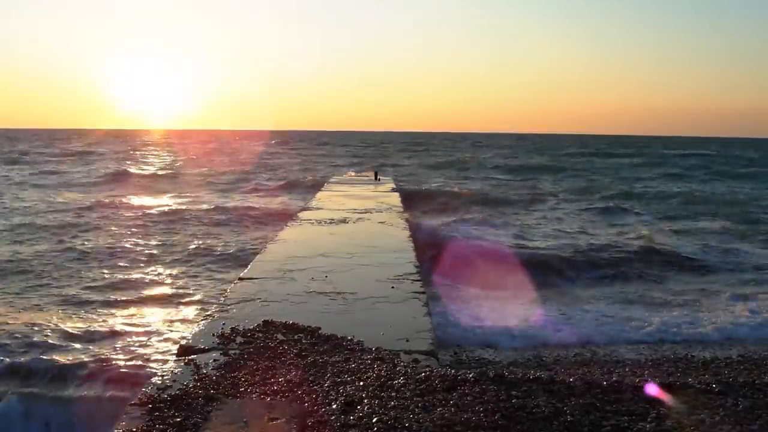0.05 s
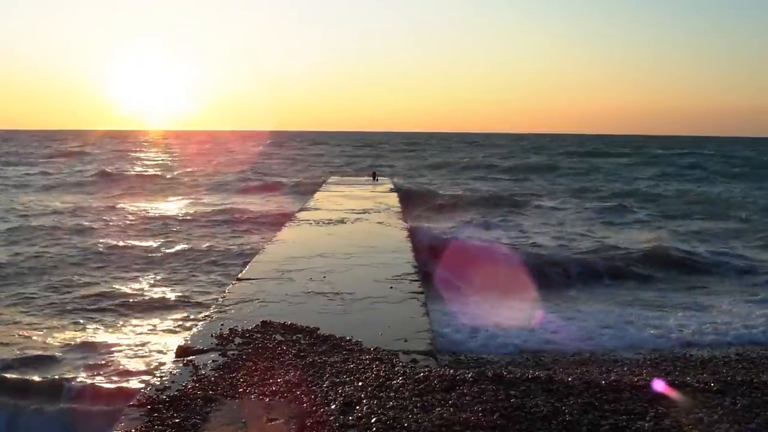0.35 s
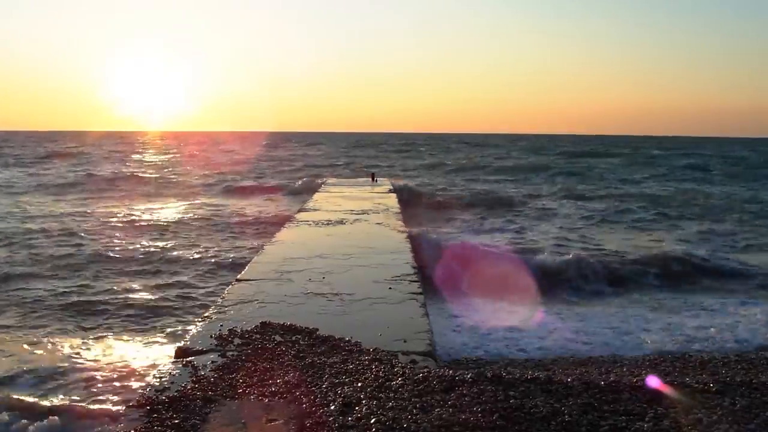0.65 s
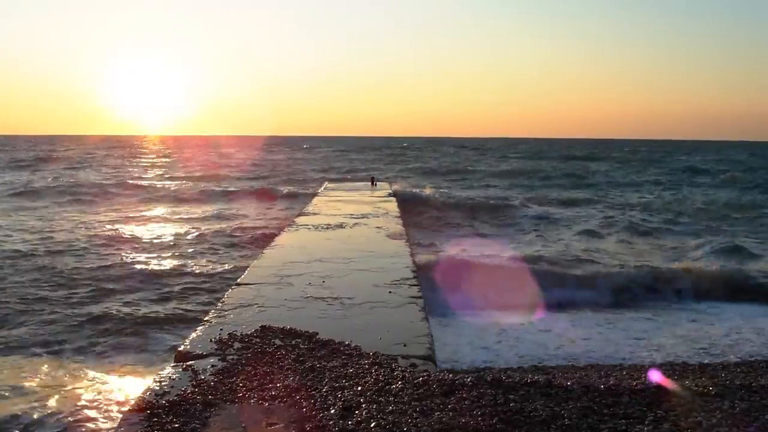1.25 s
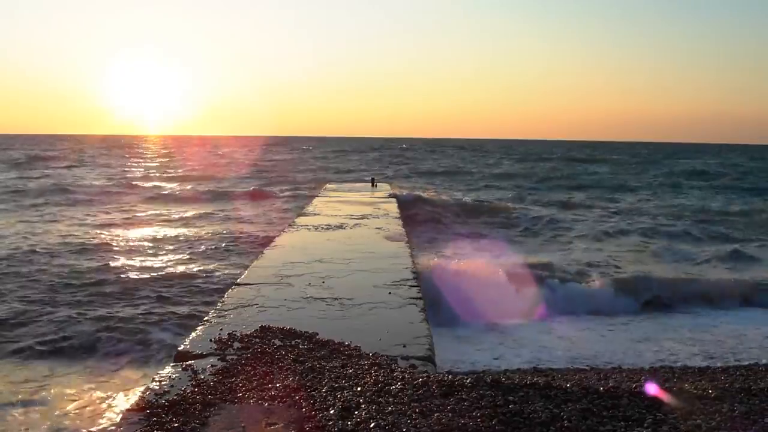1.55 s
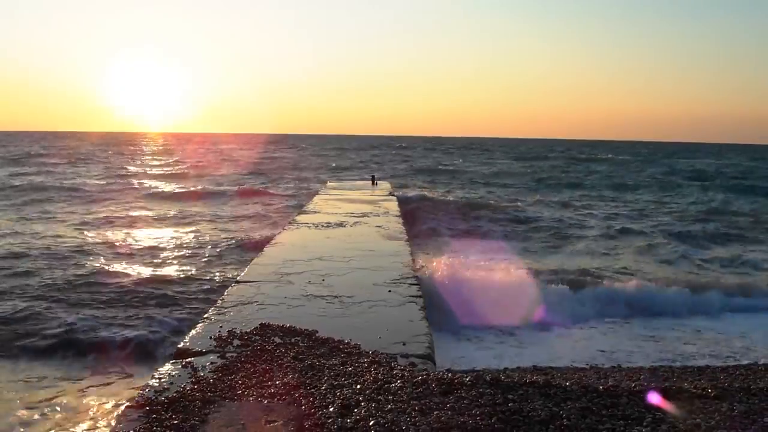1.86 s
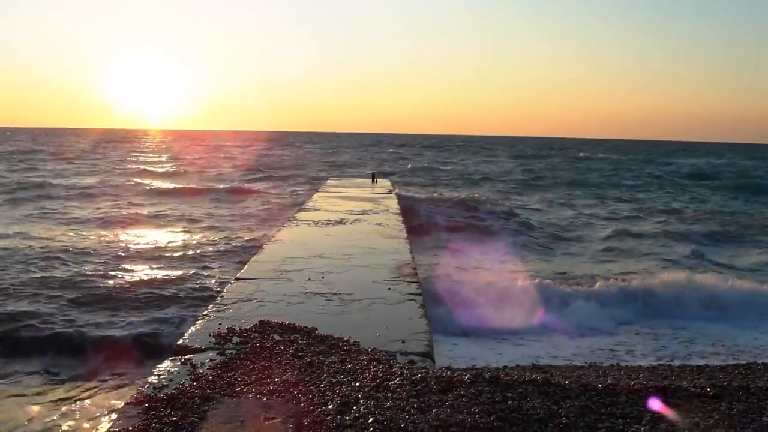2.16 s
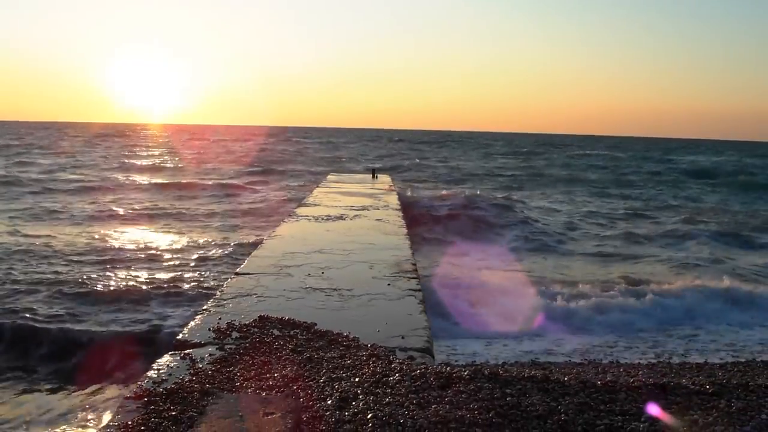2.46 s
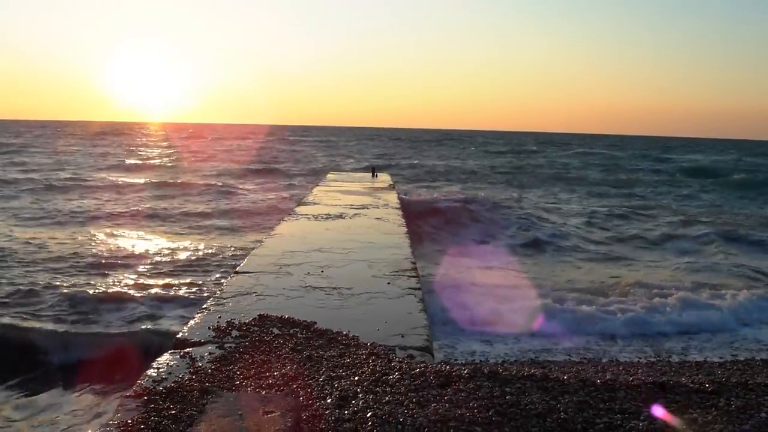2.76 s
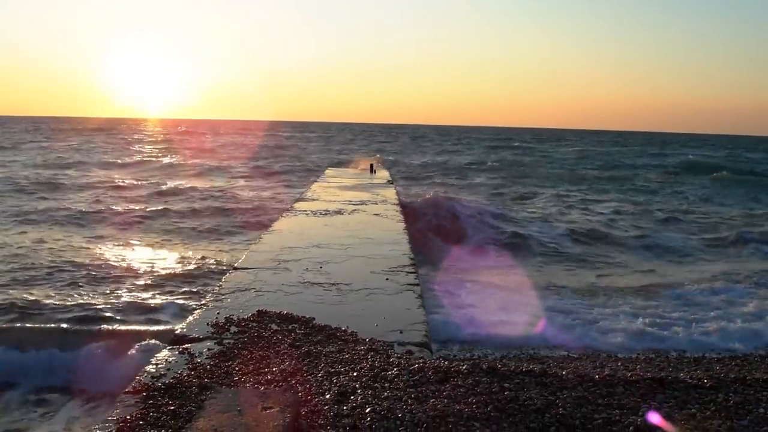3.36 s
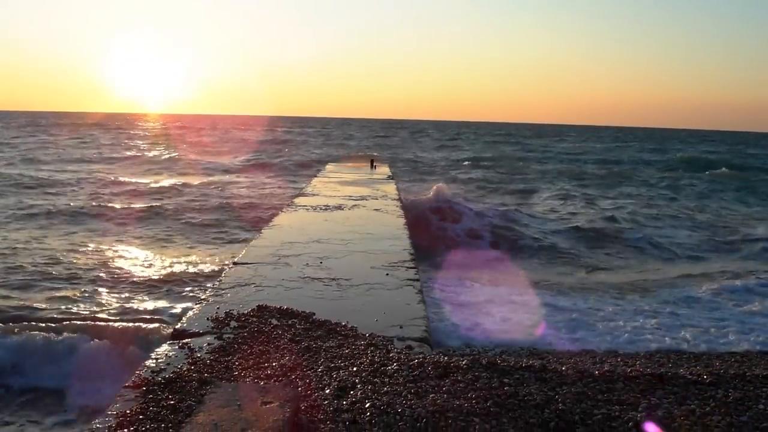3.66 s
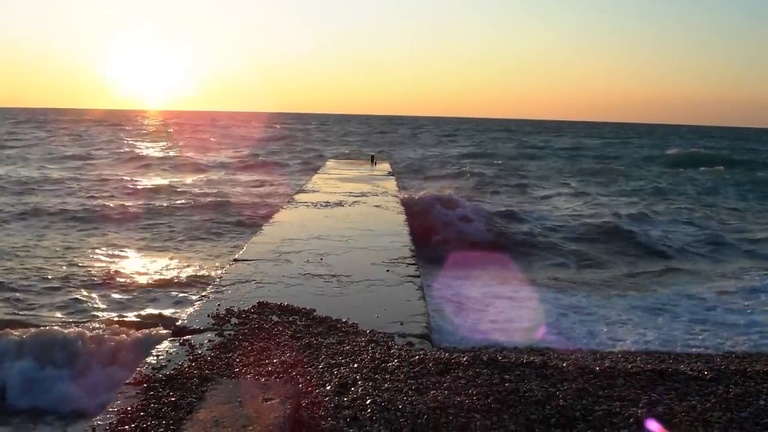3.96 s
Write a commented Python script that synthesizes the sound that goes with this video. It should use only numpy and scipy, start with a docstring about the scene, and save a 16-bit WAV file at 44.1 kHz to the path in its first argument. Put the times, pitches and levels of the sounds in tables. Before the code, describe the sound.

Waves break and wash up a pebble beach on the right, with fizzing foam and rattling stones. Strong gusts thump on the microphone throughout. A sharp double tick sounds midway, then another wave spills nearly straight ahead.

```python
"""A pebble beach beside a concrete pier, heard through a camera's stereo microphone in the wind.
Waves break and wash up on the right; late on, one spills left of the pier, nearly straight ahead.
The water churns, foam fizzes and pebbles rattle, with one sharp double tick close by.
Gusts buffet the two microphone ports, each on its own, the right one harder."""
import sys
import numpy as np
from scipy import signal
from scipy.fft import rfft, irfft, next_fast_len
from scipy.io import wavfile
from scipy.ndimage import uniform_filter1d, minimum_filter1d, map_coordinates

SR = 44100
rng = np.random.default_rng(int(sys.argv[2]) if len(sys.argv) > 2 else 0)


def waveform_to_disk(signal):
    """Save audio, clipped to [-1, 1], as 16-bit WAV at the path in sys.argv[1]."""
    frames = np.transpose(np.atleast_2d(signal))
    scaled = np.clip(frames, -1, 1) * 32767
    samples = np.round(scaled).astype(np.int16)
    wavfile.write(sys.argv[1], SR, samples)


N = 176400
T = np.arange(N) / SR

# surf on the right (time [s], relative wash level [dB], relative foam level [dB])
SURF_LEVELS = [(0, -45, -44.5), (.27, -39.5, -41), (.55, -38, -40.5), (.72, -40, -42.5),
               (1.05, -38.7, -41.5), (1.34, -39, -43.5), (1.5, -44, -48.5), (1.72, -43.5, -46),
               (2.05, -41, -45), (2.2, -43, -47), (2.5, -42.5, -47.5), (2.68, -43.5, -49),
               (2.92, -41.5, -44.5), (3.2, -44.5, -44), (4, -41, -51)]
# colour of its wash and foam (frequency [Hz], relative level [dB])
SURF_WASH_SPECTRUM = [(100, -9), (400, 1.5), (900, 1.5), (1300, -2.5), (1750, -4.5), (2300, -3.5),
                      (3500, -6), (5000, -10.5), (7000, -16.5), (12000, -47)]
SURF_FOAM_SPECTRUM = [(2000, -23), (4000, -1.5), (6000, -4.5), (8000, -2.5), (10000, -2), (12200, 2.5),
                      (13500, -0.5), (15000, -9)]
# likeness of left and right (frequency [Hz], coherence [0-1])
WASH_COHERENCE = [(300, 1), (1200, 0.99), (2000, 0.89), (3500, 0.71), (6000, 0.56)]
SURF_FOAM_COHERENCE = [(4000, 0.42), (8000, 0.14), (13000, 0.29)]
# steady wind on the microphone (time [s], relative level [dB])
WIND_LEVELS = [(0, -27), (.17, -26), (.33, -21), (.65, -21.5), (1.1, -19.5), (1.6, -21), (2.2, -20.5),
               (2.7, -22.5), (3.05, -24), (3.2, -24), (3.35, -22), (3.5, -24), (3.7, -24.5), (4, -24)]
# brief changes in it, mostly lulls (time [s], length [s], level change [dB])
WIND_LULLS = [(.12, .16, -0.5), (0.517, 0.027, -4), (1.605, 0.049, -6.5), (2.894, 0.034, -7.5),
              (3.197, 0.048, 0.5), (3.484, .05, -2.5)]
# strongest gusts at each port (time [s], length [s], thump [dB], flutter [dB], tearing [dB])
LEFT_GUSTS = [(.385, .06, -15.5, -29, -34), (.427, 0.035, -20, -21, -29), (.608, 0.024, -12, -15, -22.5),
              (.732, .02, -20, -23, -34), (.96, .04, -16.5, -24, -30), (1.008, 0.023, -12, -16.5, -36),
              (1.125, 0.044, -29, -19.5, -34), (1.34, .026, -12.5, -29, -36),
              (1.386, 0.024, -10.5, -18, -35), (1.472, 0.011, -25, -17, -19.5),
              (1.495, 0.02, -26, -18, -22.5), (1.565, 0.031, -13, -27, -36),
              (1.648, 0.016, -19, -15.5, -35), (1.742, 0.036, -18, -20, -27), (2.06, 0.045, -14, -21, -40),
              (2.17, 0.054, -22, -20, -37), (2.552, 0.014, -7, -17.5, -38), (2.857, 0.015, -11, -25, -40),
              (2.955, 0.0088, -23, -20, -19), (3, 0.11, -17.5, -23.5, -42),
              (3.106, 0.017, -9.5, -12, -26.5), (3.132, 0.014, -12.5, -20, -38),
              (3.299, 0.028, -10.5, -22.5, -35), (3.636, 0.021, -10, -11.5, -30),
              (3.678, 0.016, -17, -17, -34), (3.763, 0.016, -17, -11.5, -30),
              (3.885, 0.042, -18, -23.5, -35), (3.96, .05, -19, -20.5, -39)]
RIGHT_GUSTS = [(.006, 0.017, -26, -15, -31.5), (.281, 0.011, -24, -13, -22), (.31, 0.019, -9, -17, -28),
               (.328, 0.02, -22, -16, -27), (.383, 0.0076, -25, -10.5, -16), (.399, 0.025, -11, -14.5, -19),
               (.55, 0.035, -22, -13, -31), (.629, 0.03, -16, -11.5, -26), (.66, 0.022, -12, -17, -24.5),
               (.694, 0.021, -16, -15, -22), (.765, 0.02, -14, -17, -30), (.975, .022, -13, -17.5, -32),
               (1.01, 0.026, -6, -17, -38), (1.075, 0.016, -23, -15, -30), (1.148, 0.041, -25, -15, -27),
               (1.347, 0.019, -8.5, -15, -27), (1.378, 0.031, -13, -14, -23),
               (1.43, 0.045, -11.5, -21, -24.5), (1.519, 0.029, -8, -14, -26),
               (1.574, 0.021, -7, -13.5, -24.5), (1.657, 0.026, -8.5, -15.5, -28),
               (1.73, 0.085, -19, -18, -30), (1.832, 0.036, -15, -15.5, -25.5),
               (1.915, 0.027, -18, -18, -31), (2.08, 0.052, -14.5, -17.5, -27.5),
               (2.13, 0.017, -11, -16, -32), (2.186, 0.022, -16, -21, -31), (2.348, 0.011, -21, -12, -33),
               (2.473, 0.019, -9, -19, -31), (2.494, 0.015, -9, -27, -41), (2.611, .009, -12, -12.5, -24),
               (2.634, .026, -15.5, -29, -42), (2.835, 0.054, -9, -27, -44),
               (2.865, 0.018, -10.5, -16, -36), (2.945, .025, -11.5, -28, -35),
               (2.976, 0.021, -6, -12, -26), (3.011, 0.021, -8.5, -12, -32), (3.06, .06, -16, -19.5, -45),
               (3.373, .012, -22, -15, -24), (3.567, .024, -9, -32, -40), (3.64, 0.043, -9.5, -18, -41),
               (3.668, .018, -16, -19, -34), (3.755, 0.067, -12.5, -21, -33),
               (3.895, 0.017, -8.5, -13.5, -34)]
# colour of the wind's three layers (frequency [Hz], relative level [dB])
THUMP_SPECTRUM = [(8, 1.5), (20, 1.5), (50, 0.5), (110, -2.5), (150, -8), (250, -18.5), (500, -46),
                  (2000, -120)]
FLUTTER_SPECTRUM = [(50, -13), (120, -1), (220, 1.5), (350, -4), (500, -11.5), (750, -20.5), (1100, -33),
                    (2500, -66), (6000, -120)]
TEARING_SPECTRUM = [(150, -31), (400, 8.5), (650, 0.5), (900, -7), (1300, -14.5), (2000, -24.5),
                    (5000, -55), (10000, -120)]
# ticks near the microphone (time [s], relative level [dB])
CLOSE_TICKS = [(1.8212, -15), (1.8595, -29)]
# colour of a tick (frequency [Hz], relative level [dB])
TICK_SPECTRUM = [(4000, -20), (5700, -10), (6700, 1.5), (7400, -1), (8700, -10), (10000, -11), (11700, -.5),
                 (13000, -2), (14500, 0), (15500, -5)]
# the late breaker (time [s], relative wash level [dB], relative foam level [dB])
BREAKER_LEVELS = [(2.7, -55, -68), (3.3, -42.5, -47.5), (3.38, -36.7, -44.5), (3.54, -40.5, -43.5),
                  (3.8, -39.5, -41.5), (4, -41, -40)]
# colour of its wash and foam (frequency [Hz], relative level [dB])
BREAKER_WASH_SPECTRUM = [(100, -4), (400, -5), (850, 3), (1300, -6.5), (1750, -3), (2300, -3), (3500, -4),
                         (5000, -13), (7000, -13), (12000, -36)]
BREAKER_FOAM_SPECTRUM = [(2000, -16), (4000, 1), (6000, -3.5), (9000, 0.5), (12200, 2.5), (13500, -0.5),
                         (15000, -9)]

TOP_HZ = 15200


def amp(db):
    """Decibels to gain."""
    return 10 ** (np.asarray(db) / 20)


def unit(x):
    """Scale to rms 1."""
    return x / np.sqrt(np.mean(x ** 2) + 1e-20)


def along(points, hz):
    """Interpolate (frequency, value) points on a log frequency axis."""
    knots_hz, values = np.transpose(points)
    return np.interp(np.log(hz + 1), np.log(knots_hz + 1), values)


def curves(rows):
    """One value per sample for each column after the time."""
    times, *columns = np.transpose(rows)
    return [np.interp(T, times, column) for column in columns]


def wobble(knots_per_s):
    """A smooth random curve."""
    return map_coordinates(rng.standard_normal(2048), [T * knots_per_s], mode="wrap")


def bump(time, length):
    """A bell-shaped swell around a time."""
    return np.exp(-(2 * (T - time) / length) ** 2)


def filtered(x, response):
    """Filter x by a complex response of frequency."""
    size = next_fast_len(N + 8192)
    return irfft(rfft(x, size) * response(np.fft.rfftfreq(size, 1 / SR)), size)[..., :N]


def noise(spectrum):
    """Coloured noise of rms 1."""
    return unit(filtered(rng.standard_normal(N), lambda hz: amp(along(spectrum, hz))))


def placed(pair, lag_s, right_db):
    """A source to the right reaches the left port later and weaker."""
    sides = np.array([[-.5], [.5]])
    return amp(sides * right_db) * filtered(pair, lambda hz: np.exp(2j * np.pi * hz * lag_s * sides))


def rush(spectrum, coherence, patchy_db):
    """Stereo water noise of rms 1, patchy in time and frequency."""
    def mid_side(hz):
        angle = np.arccos(np.clip(along(coherence, hz), -1, 1)) / 2
        return amp(along(spectrum, hz)) * np.array([np.cos(angle), np.sin(angle)])

    cells = signal.stft(rng.standard_normal((2, N)), nperseg=512)[2]
    patches = uniform_filter1d(rng.standard_normal(cells.shape[1:]), size=8, axis=0)
    patches = unit(uniform_filter1d(patches, size=12, axis=1))
    pair = signal.istft(cells * amp(patchy_db * patches), nperseg=512)[1][:, :N]
    mid, side = filtered(pair, mid_side)
    return unit(np.array([mid + side, mid - side]))


def pebbles(clicks_per_s=1500, median_hz=5590, ring_cycles=5, spread_db=2, range_db=19):
    """Dense short clicks of stones and bursting bubbles, scattered across the shore."""
    when, pitch, rank, pan = rng.uniform(1e-4, 1 - 1e-4, (int(clicks_per_s * N / SR), 4)).T
    hz = np.clip(median_hz * (pitch / (1 - pitch)) ** .3, 900, TOP_HZ)[:, None]
    age = np.arange(160)
    cycles = hz * age / SR
    gain = amp(np.minimum(-spread_db * np.log(rank), range_db))  # many faint, a few loud
    clicks = gain[:, None] * np.sin(2 * np.pi * cycles) * np.exp(-2 * cycles / ring_cycles)
    samples = ((when * N).astype(int)[:, None] + age).ravel()
    panned = [clicks * np.sqrt(share)[:, None] for share in (pan, 1 - pan)]
    return unit(np.array([np.bincount(samples, side.ravel(), N)[:N] for side in panned]))


def wave(levels, wash_spectrum, foam_spectrum, foam_coherence, wash_db, foam_db, churn_db):
    """Churning water, with foam and pebbles over it: a wash pair and a foam pair."""
    wash_level, foam_level = curves(levels)
    churn = churn_db * wobble(14)
    wash = amp(wash_level + wash_db + churn) * rush(wash_spectrum, WASH_COHERENCE, patchy_db=1.12)
    fizz = rush(foam_spectrum, foam_coherence, patchy_db=.6) + amp(-7.5) * pebbles()
    return wash, amp(foam_level + foam_db + churn) * fizz


def surf():
    """The long wash up the stones, right of the pier."""
    wash, foam = wave(SURF_LEVELS, SURF_WASH_SPECTRUM, SURF_FOAM_SPECTRUM, SURF_FOAM_COHERENCE,
                      wash_db=5, foam_db=2, churn_db=.31)
    return placed(wash, lag_s=3.6e-5, right_db=2) + placed(foam, lag_s=1.5e-5, right_db=.5)


def turbulence(spectrum, even_s):
    """Coloured noise whose level, taken over even_s, stays near 1."""
    air = noise(spectrum)
    window = np.hanning(int(2 * even_s * SR))
    for _ in range(2):
        power = np.abs(signal.fftconvolve(air ** 2, window / window.sum(), "same"))
        air = unit(air / np.sqrt(power + 1e-6))
    return air


def buffeting(gusts, thump_db, flutter_db, tearing_db):
    """Wind at one port: slow eddies thump, faster ones flutter, the hardest gusts tear in short rips."""
    lulls_db = sum(db * bump(time, length) for time, length, db in WIND_LULLS)
    wind_db = curves(WIND_LEVELS)[0] + lulls_db
    eddies = .7 * wobble(13) + 2 * wobble(45)
    rips = wobble(90)
    layers = [(THUMP_SPECTRUM, .034, thump_db + .5 * eddies + 2 * wobble(30)),
              (FLUTTER_SPECTRUM, .016, flutter_db + eddies + 3 * rips),
              (TEARING_SPECTRUM, .011, tearing_db + .62 * eddies + 3.3 * rips)]
    out = np.zeros(N)
    for layer, (spectrum, even_s, swing_db) in enumerate(layers):
        wind_power = amp(wind_db + swing_db) ** 2
        gust_power = sum(amp(db[layer]) ** 2 * bump(time, length) for time, length, *db in gusts)
        out += np.sqrt(wind_power + gust_power) * turbulence(spectrum, even_s)
    return out


def wind():
    """Wind right on the microphone: each port has its own eddies."""
    return np.array([buffeting(LEFT_GUSTS, thump_db=0, flutter_db=-7, tearing_db=-19.5),
                     buffeting(RIGHT_GUSTS, thump_db=2, flutter_db=-.77, tearing_db=-15)])


def ticks(t60_s=.0055):
    """A tiny hard click close to the microphone and its faint repeat."""
    out = np.zeros(N)
    for time, db in CLOSE_TICKS:
        decay_db = 60 * np.maximum(T - time, 0) / t60_s
        out += (T >= time) * amp(db - decay_db) * noise(TICK_SPECTRUM)
    return out * amp([[-1], [1]])  # a little to the right


def breaker():
    """A wave spills left of the pier, nearly straight ahead of the microphone."""
    wash, foam = wave(BREAKER_LEVELS, BREAKER_WASH_SPECTRUM, BREAKER_FOAM_SPECTRUM,
                      foam_coherence=[(4000, .76), (13000, .6)], wash_db=2, foam_db=2, churn_db=.5)
    return placed(wash, lag_s=3e-6, right_db=1) + placed(foam, lag_s=3e-6, right_db=0)


def scene():
    """Sea, stones and wind as they reach the microphone."""
    return surf() + wind() + ticks() + breaker()


def record(dry):
    """The camera's limiter holds the hardest gusts at full scale; nothing passes above its band limit."""
    needed_gain = 1 / np.maximum(np.abs(dry).max(axis=0), 1)
    smooth_gain = uniform_filter1d(minimum_filter1d(needed_gain, size=301), size=301)
    return filtered(dry * smooth_gain, lambda hz: hz < TOP_HZ)


dry = scene()
out = record(dry)
waveform_to_disk(out)
```